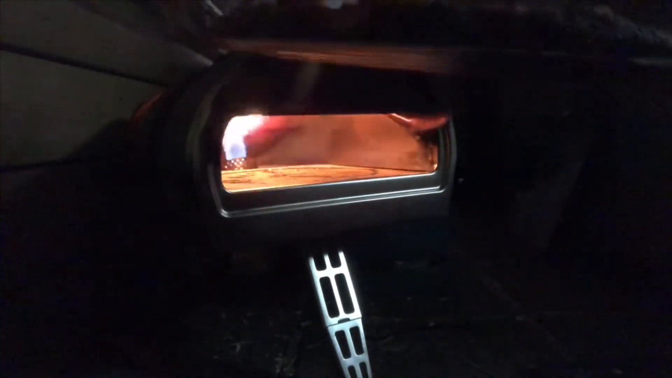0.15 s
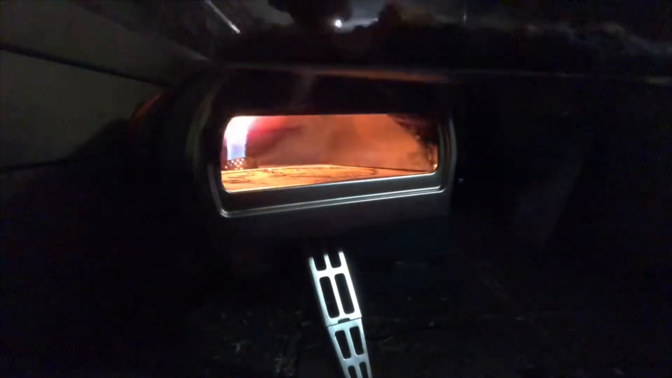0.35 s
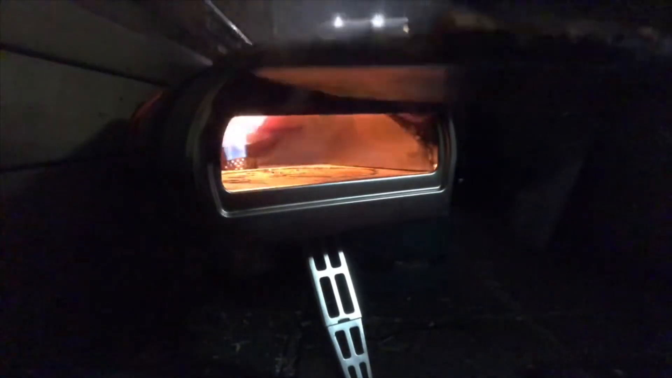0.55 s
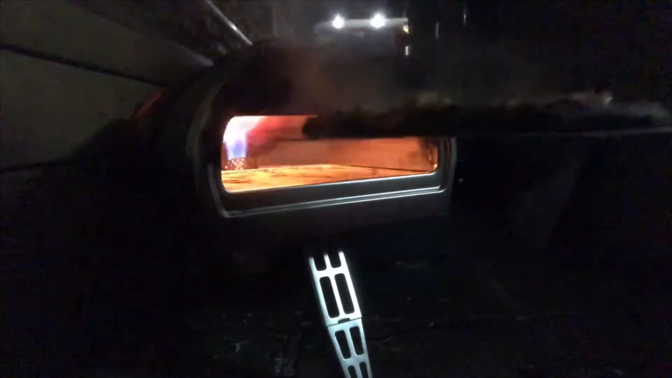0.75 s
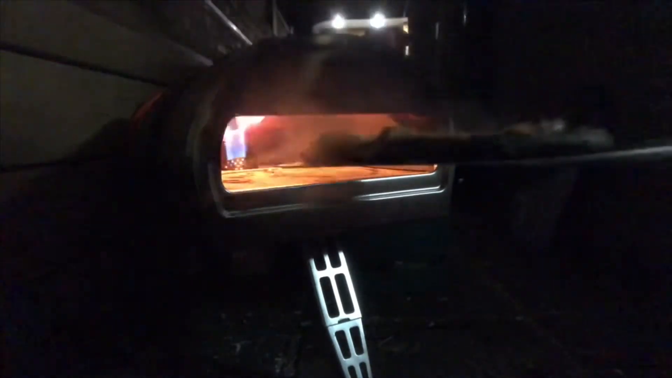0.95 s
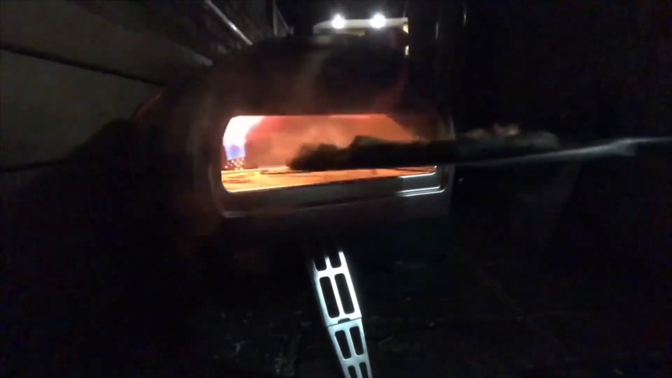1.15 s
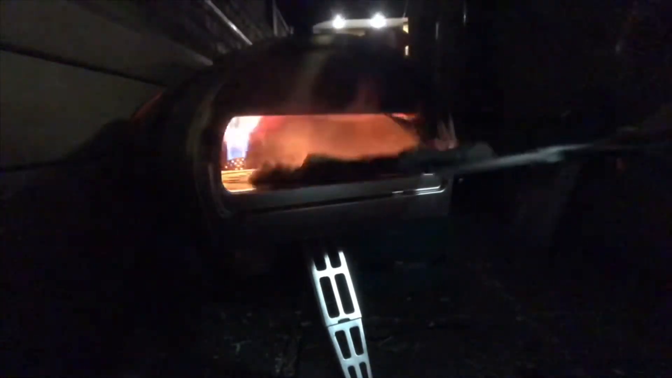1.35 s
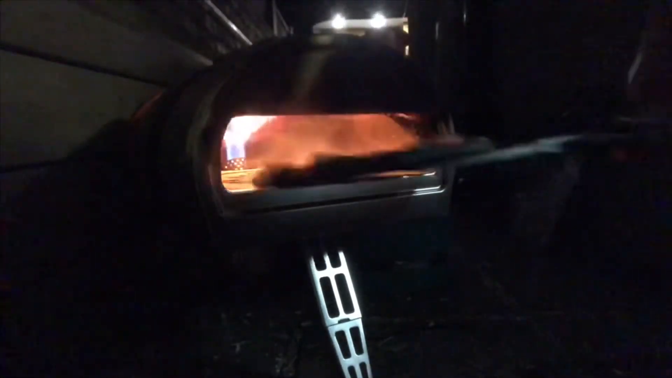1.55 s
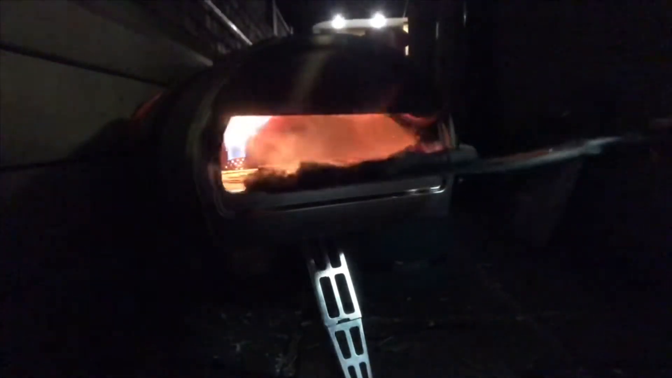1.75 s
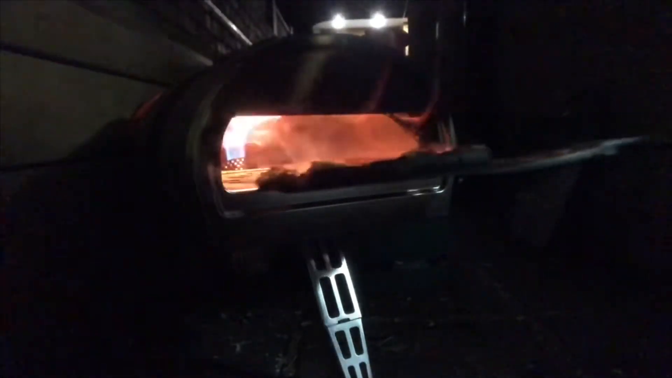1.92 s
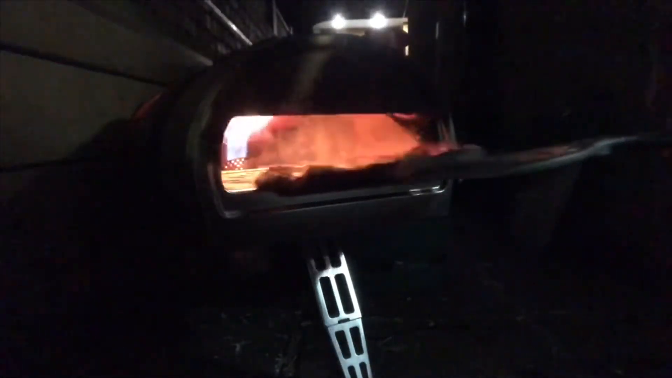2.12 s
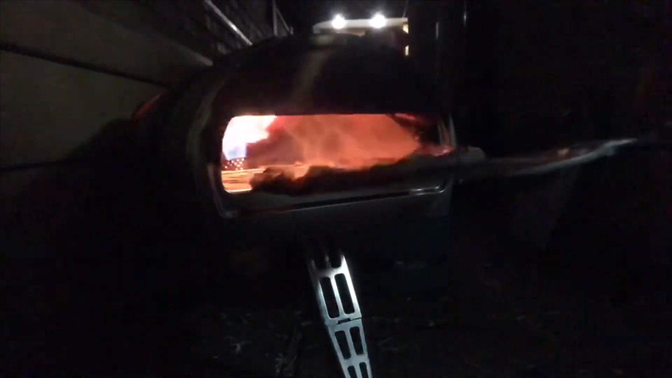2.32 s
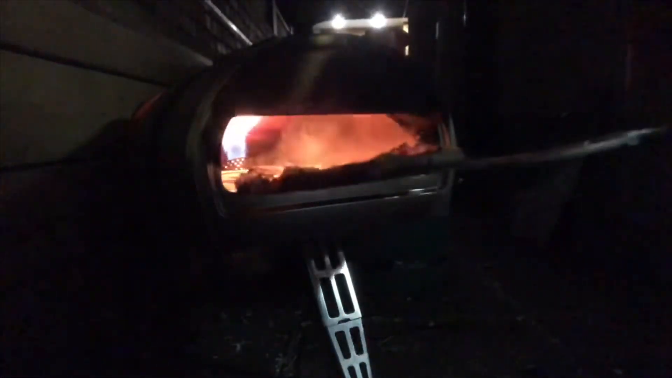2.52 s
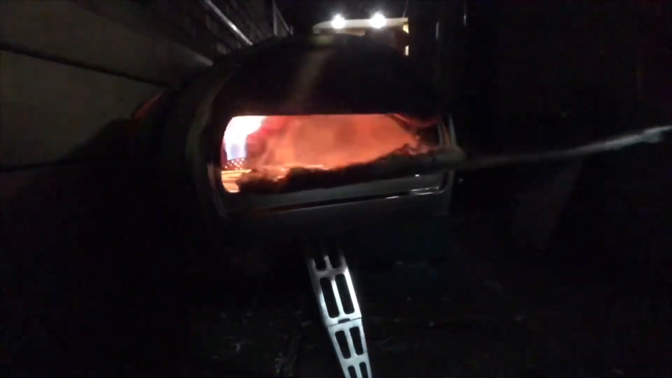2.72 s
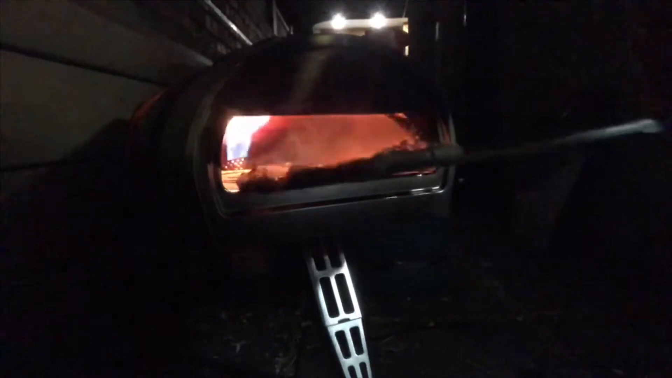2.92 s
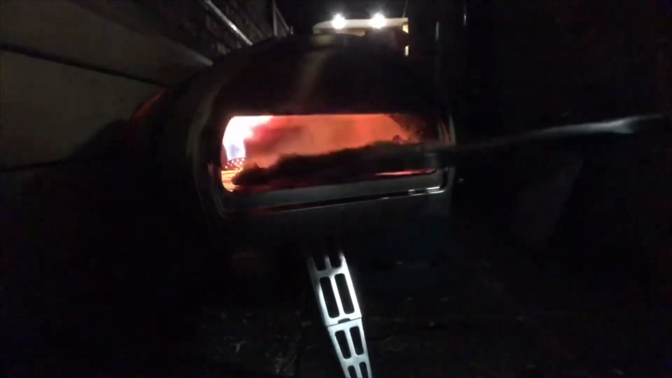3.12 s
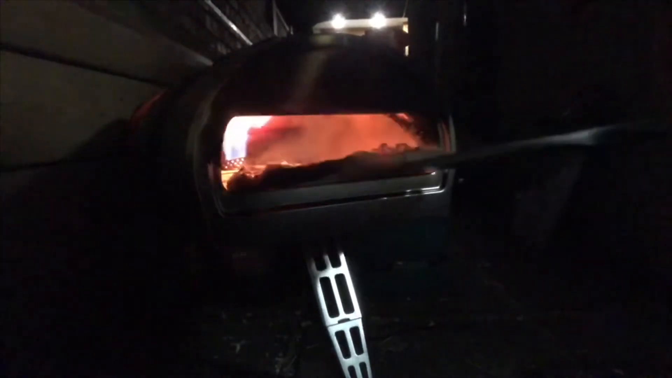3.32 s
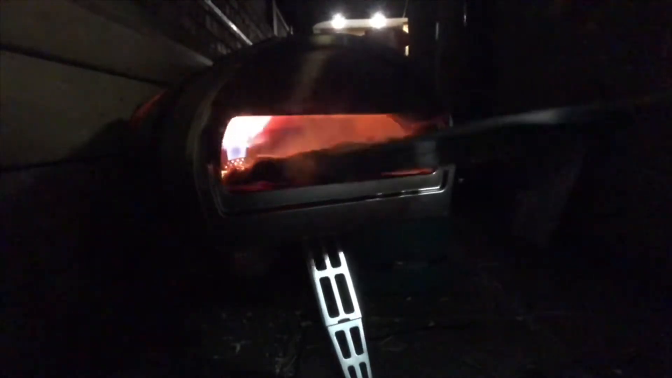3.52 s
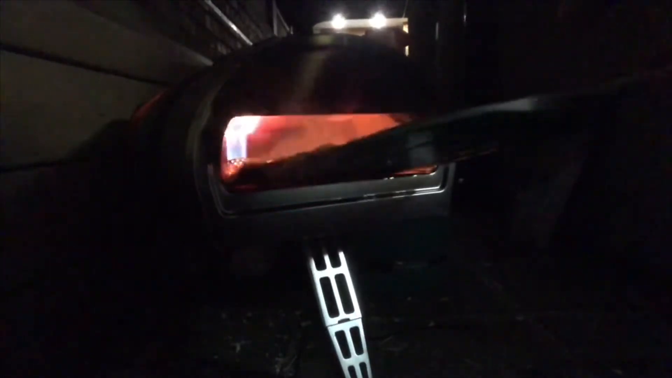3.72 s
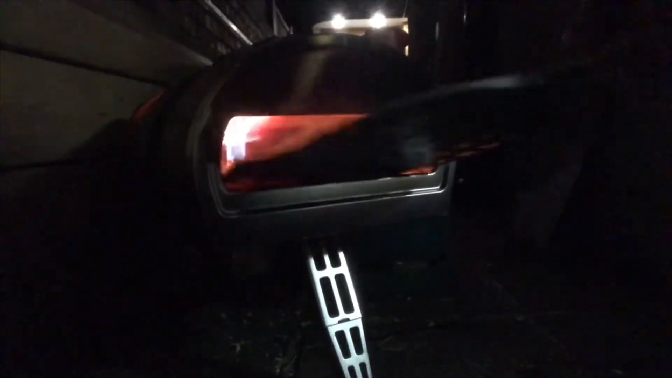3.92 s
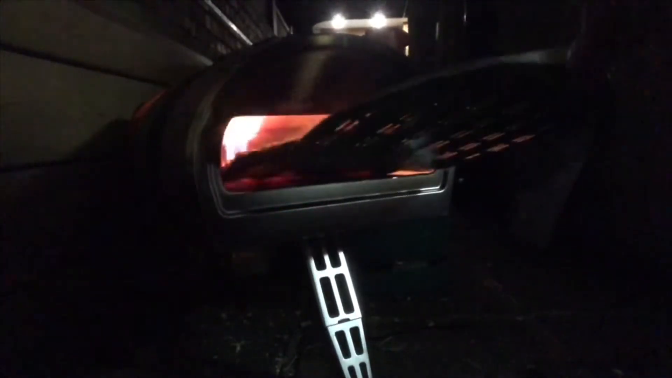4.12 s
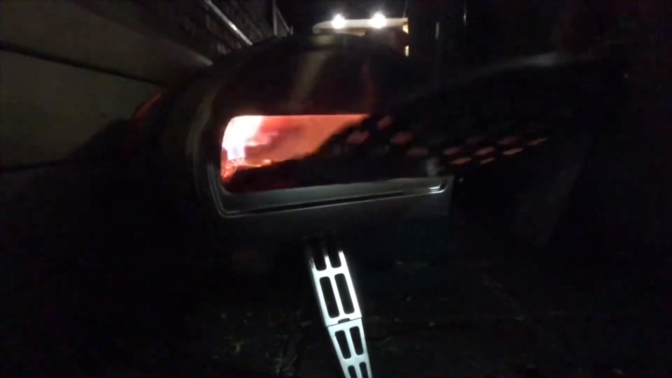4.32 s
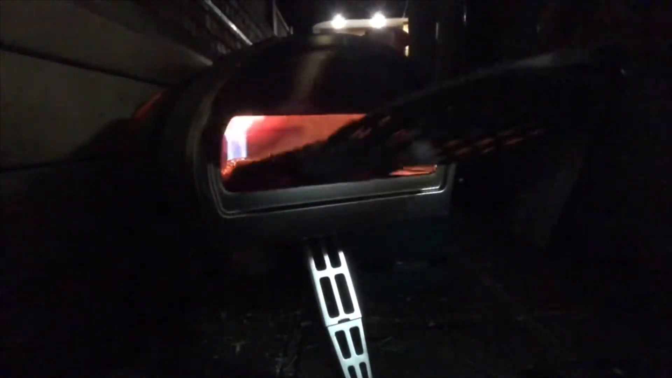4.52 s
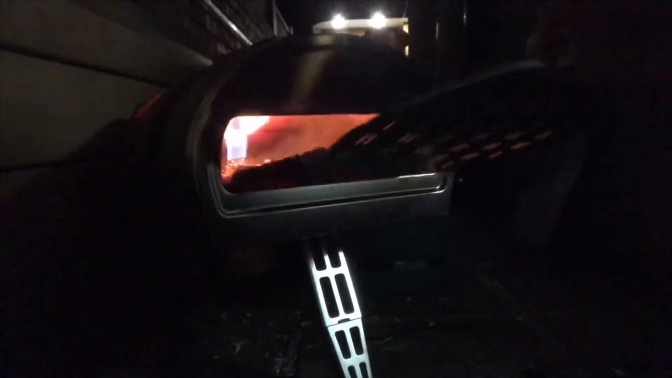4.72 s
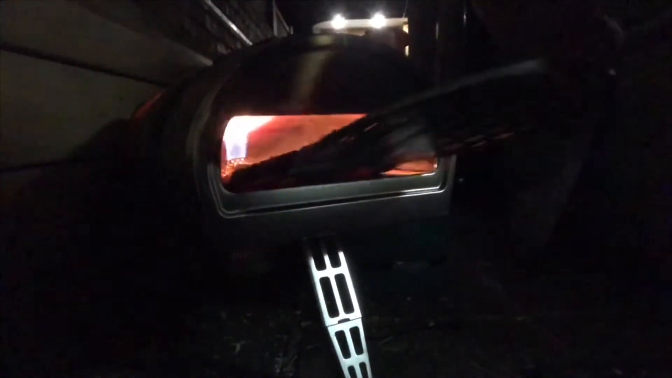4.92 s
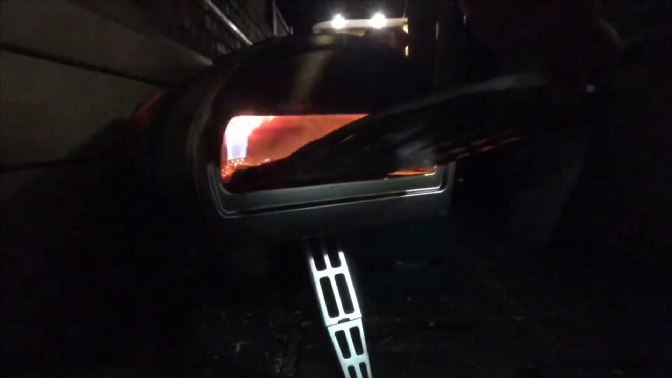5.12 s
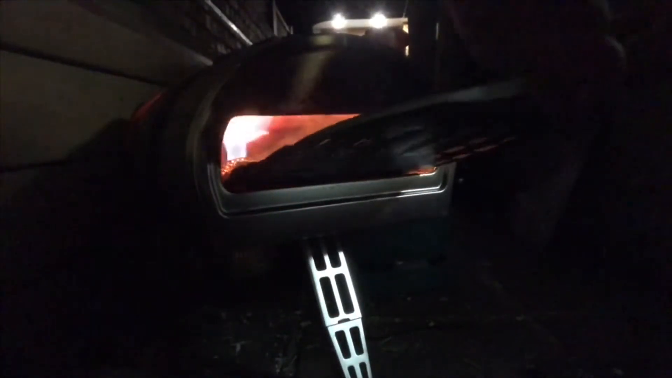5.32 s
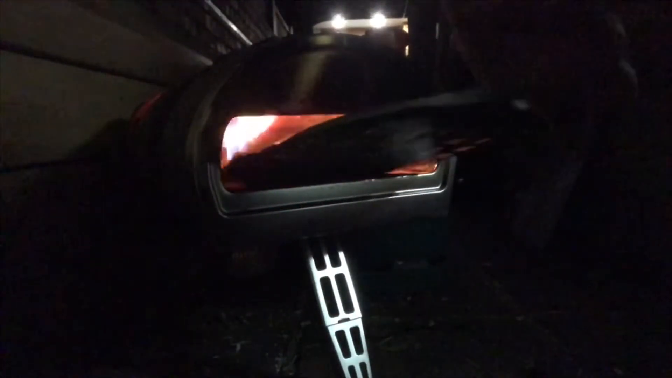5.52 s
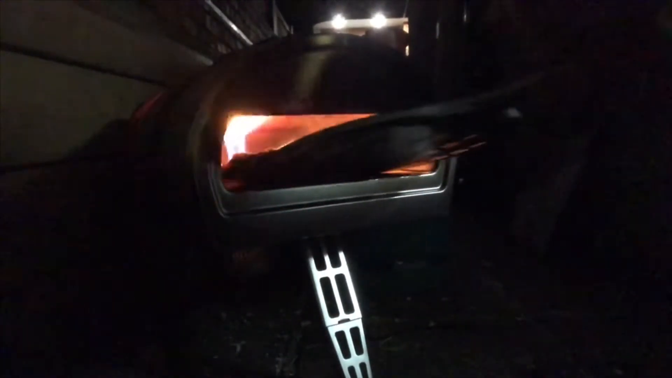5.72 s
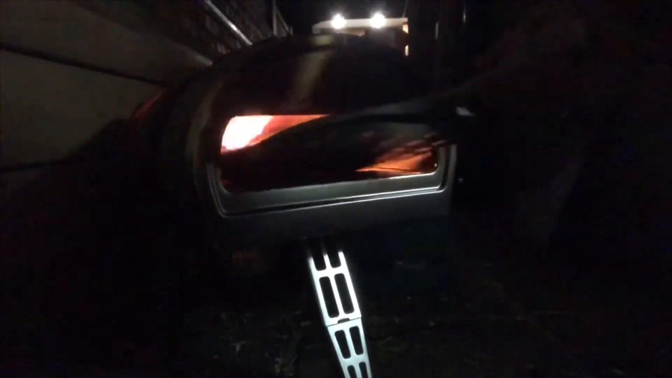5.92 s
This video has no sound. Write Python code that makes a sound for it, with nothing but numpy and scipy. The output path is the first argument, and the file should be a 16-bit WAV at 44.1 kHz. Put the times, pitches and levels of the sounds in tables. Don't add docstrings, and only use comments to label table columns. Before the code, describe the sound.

A thin metal peel knocks and rasps in short dry strokes over a stone oven floor, above a faint steady burner roar and hiss.

```python
import sys
import numpy as np
from scipy import signal
from scipy.fft import rfft, irfft, next_fast_len
from scipy.io import wavfile
from scipy.ndimage import uniform_filter1d

SR = 44100
rng = np.random.default_rng(int(sys.argv[2]) if len(sys.argv) > 2 else 0)


def invert_db(level):
    return 10 ** (np.asarray(level, dtype=float) / 20)


def store_wav(level_fs):
    pcm = np.round(np.clip(np.atleast_2d(level_fs), -1, 1) * 32767)
    wavfile.write(sys.argv[1], SR, pcm.T.astype(np.int16))


N = 267246

# pitch_hz, level_db, t60_s
HUM_MODES = [(200, -11, 0.015), (228, -7.5, 0.063), (323.3, -11.5, 0.2), (362, -7, 0.09)]
# pitch_hz, level_db, t60_s
BLADE_MODES = [(421, -12.5, 0.087), (472, -9.5, 0.071), (598, -3.5, 0.059), (730, 0, 0.037),
               (790, -9, 0.14), (870, -1, 0.05), (986, 4.5, 0.037), (1098, 4.5, 0.023), (1181, 6, 0.028),
               (1256, 4.5, 0.067), (1356, 1.5, 0.05), (1545, -9, 0.15), (1772, -6.5, 0.12),
               (1880, 3.5, 0.025), (1947, -3.5, 0.041), (2290, -0.5, 0.0093), (2480, 4, 0.031),
               (2656, -7, 0.11), (3004, 0.5, 0.031), (3260, -15, 0.037), (3870, 2, 0.07)]
# start_s, hold_s, rasp_db, blade_above_rasp_db, sizzle_above_rasp_db
LANDINGS = [(1.364, 0.051, -37, -4.5, -4.5), (1.463, 0.051, -39.5, -8, 1.5), (1.859, 0.011, -48.5, 8, -6),
            (2.1835, 0.036, -41, 5, -4), (2.558, 0.075, -41, 1.5, -7), (2.786, 0.072, -42, 1.5, -15.5),
            (3.13, 0.0047, -36.5, -2.5, -28), (3.333, 0.0068, -58.5, 14.5, 11),
            (3.414, 0.0069, -45.5, -4, -0.5), (3.568, 0.026, -37, -4.5, -22), (3.73, 0.033, -36, -7.5, -3),
            (3.844, 0.042, -32.5, 0, -5), (4.193, 0.0087, -56.5, 9, -23), (4.48, 0.0087, -39.5, -0.5, -1),
            (4.642, 0.0055, -46, 8.5, -30), (5.115, 0.0093, -60, 1, -12), (5.255, 0.061, -40, -8.5, -6),
            (5.464, 0.0054, -54, 17, -24), (5.616, 0.021, -29.5, 4.5, -4), (3.803, 0.044, -45, 2.5, -10),
            (1.763, 0.03, -43.5, -14, 0.5), (2.914, 0.033, -54, 8.5, -5), (3.705, 0.041, -47.5, 6, -10),
            (1.913, 0.023, -50, -7, 0), (3.9, .015, -43, 0, -10), (3.94, .012, -37, -8, -5),
            (3.28, 0.012, -52.5, -3, -7), (5.988, .02, -37, -15, 1)]


def scrape():
    # pitch_hz, density_db (per Hz)
    rasp_spectrum = [(880, -44), (1500, 0), (1590, -5.5), (2080, -4), (2800, 0.5), (2970, -0.5),
                     (4120, 2.5), (6960, -2.5), (11700, -11.5), (16000, -21.5)]
    rasp_db, blade_db, sizzle_db = strokes()
    touched = np.arange(N) >= LANDINGS[0][0] * SR
    rasp = touched * invert_db(rasp_db)
    force = grit(per_s=9000, spread_db=2.5, clump_db=1.5)
    low = rubbed(HUM_MODES, force * rasp * invert_db(blade_db - 16), wander_db=6.5)
    blade = rubbed(BLADE_MODES, force * rasp * invert_db(blade_db - 5.5), wander_db=3.5)

    broad = coloured(force, rasp_spectrum)
    above_8k = signal.butter(2, 8000, "high", fs=SR, output="sos")
    sizzle = signal.sosfiltfilt(above_8k, broad)
    drive = rasp * (rms_one(broad - sizzle) + invert_db(sizzle_db + 1.0) * rms_one(sizzle))

    points = 14
    pressure = np.array([wander(4.8, 7.8) for point in range(points)])
    pressure /= np.sqrt(np.sum(pressure ** 2, axis=0))
    responses = plate_responses(count=points, length=4096)
    plate = signal.fftconvolve(drive * pressure, responses, axes=1)[:, :N].sum(axis=0)
    return low + blade + invert_db(-2.0) * plate + invert_db(-7.5) * drive


def strokes():
    # full_speed_s, hold_s, rasp_db, blade_above_rasp_db, sizzle_above_rasp_db
    sweeps = [(1.601, 0.013, -34.5, -5.5, 0), (1.698, .01, -40, -8, 3.5), (5.85, .015, -35, -17, -1),
              (3.527, .006, -40, -3, -3), (1.722, 0.0098, -29, -6, 1.5), (1.923, 0.042, -39.5, -10.5, 1),
              (1.993, 0.043, -47, -6, -2.5), (1.634, 0.014, -42.5, -10, 0), (2.307, 0.041, -42, 3, -5.5),
              (2.385, 0.017, -39, 1.5, -6), (2.485, 0.032, -36, -7, -2.5), (2.697, 0.031, -37.5, -11, -0.5),
              (2.994, 0.06, -35.5, -2, -8.5), (3.498, 0.015, -45.5, -7, -8), (3.612, 0.055, -36, 4, -8),
              (3.962, 0.02, -30, -3.5, -5), (3.98, 0.02, -26.5, -9, -2.5), (4.015, 0.054, -29, 0.5, -15),
              (4.243, 0.015, -50.5, 6.5, -23), (4.3, 0.012, -42, -23, -5.5),
              (4.534, 0.0062, -36, -8.5, -13), (4.721, 0.014, -38.5, -0.5, -9),
              (4.762, 0.014, -37, -2.5, -9), (4.993, 0.073, -50.5, -23, -7), (5.169, 0.072, -51, -3, -8),
              (5.545, 0.089, -31, -13, 1), (5.754, 0.039, -30.5, -14, -1.5), (6.022, 0.043, -28, -9.5, 4.5),
              (5.34, 0.071, -39.5, -9.5, -2.5), (5.87, 0.065, -28, -2, 1)]
    # rasp_db_per_s, blade_db_per_s, sizzle_db_per_s
    let_go = (439, 335, 540)
    # rasp_db, blade_db, sizzle_db
    resting = (-56.5, -56.5, -64)
    land_db_per_s, sweep_db_per_s, sag_db_per_s = 6000, 458, 21
    s, hold, db, blade_db, sizzle_db = np.transpose(LANDINGS + sweeps)
    rise = np.repeat([land_db_per_s, sweep_db_per_s], [len(LANDINGS), len(sweeps)])
    rasp, blade, sizzle = (gestures(s, hold, db + above, rise, sag_db_per_s, fall, rest)
                           for above, fall, rest in zip([0, blade_db, sizzle_db], let_go, resting))
    return rasp, blade - rasp, sizzle - rasp


def grit(per_s, spread_db, clump_db):
    sizes = invert_db(spread_db * np.minimum(rng.exponential(1, N), 4)) * rng.choice([-1, 1], N)
    caught = rng.random(N) < per_s / SR
    return rms_one(sizes * caught * wander(clump_db, 32.3))


def rubbed(modes, force, wander_db):
    share = [invert_db(db) * np.sqrt(t60) for hz, db, t60 in modes]
    norm = np.sqrt(np.sum(np.square(share)) * SR / (12 * np.log(10)))
    return sum(ring(force * invert_db(db) * wander(wander_db, 22.2), hz, t60) for hz, db, t60 in modes) / norm


def plate_responses(count, length):
    t, out = np.arange(length) / SR, 0
    for low_hz, high_hz, t60 in [(694, 3870, 0.048), (2900, 9140, 0.017), (7000, 22000, 0.038)]:
        band_filter = signal.butter(2, [low_hz, high_hz], "band", fs=SR, output="sos")
        band = signal.sosfilt(band_filter, rng.standard_normal((count, length)))
        out = out + band * invert_db(-60 * t / t60) / np.sqrt(t60 * SR / (6 * np.log(10)))
    for octaves in .27 * (np.arange(10)[:, None, None] + rng.random((10, count, 1))):
        out = out + invert_db(-45.5 - 60 * t / 0.16) * np.sin(2 * np.pi * 1500 * 2 ** octaves * t)
    tones = rfft(out)
    power = uniform_filter1d(np.mean(np.abs(tones) ** 2, axis=0), size=28)
    return irfft(tones / np.sqrt(power + .01))


def knocks():
    # start_s, peak_db, hum_above_peak_db, crack_above_peak_db, thud_above_peak_db
    flat_knocks = [(1.567, -38, -4, -4, -16), (1.85, -13, -17, -3, -12), (2.184, -18.5, -16, -12, -20),
                   (2.212, -23, -12, -5, -13), (2.376, -32.5, -8, -18, -13), (2.391, -21.5, -14, -4, -13.5),
                   (2.576, -15, -16.5, -2, -32), (2.792, -19.5, -39, -11, -23),
                   (3.336, -24, -29, -10.5, -37), (3.412, -35, -34, 0, -30), (3.61, -34, -21, -11, -8),
                   (3.845, -13.5, -25, -8, -8), (4.475, -20.5, -35, 2, -19), (4.641, -25, -27, -9.5, -22),
                   (4.789, -21.5, -30, -18, -9.5), (5.464, -17, -18.5, -12.5, -12.5),
                   (5.863, -20.5, -13, -16, -5)]
    # start_s, peak_db, pitch_hz (strongest), crack_above_peak_db,
    # thud_above_peak_db
    edge_knocks = [(1.363, -12, 3420, -11, -20), (1.439, -21, 1540, -10, -16.5),
                   (1.465, -25, 2570, -8, -24), (1.695, -20, 1610, -8, -35),
                   (2.454, -19.5, 1610, -7.5, -19), (3.132, -18, 3280, -3, -19),
                   (3.5676, -24.5, 2500, -1.5, -29), (3.802, -20, 1580, -23, -22),
                   (4.012, -6.5, 2600, -3, -27), (4.058, -20.5, 1570, 8, -13),
                   (4.197, -23.5, 2060, -17, -18), (4.535, -30, 1550, -6, -26), (5.116, -31, 1570, -1, -26),
                   (5.257, -28, 1590, 3, -31), (5.617, -2, 870, -3.5, -12.5), (5.682, -14, 730, -7, -23),
                   (6.01, -31, 2740, 15.5, -23)]
    flat_hz, edge_hum_db = 1240, -32
    flats = [(s, db, flat_hz, *rest) for s, db, *rest in flat_knocks]
    edges = [(s, db, hz, edge_hum_db, *rest) for s, db, hz, *rest in edge_knocks]
    s, peak_db, pitch_hz, hum_db, crack_db, thud_db = np.transpose(flats + edges)

    modes = HUM_MODES + BLADE_MODES
    luck = rng.normal(0, 1, (len(s), len(modes)))
    out = np.zeros(N)
    for k, (hz, db, t60) in enumerate(modes):
        if k < len(HUM_MODES):
            share_db = hum_db + 7.5
        else:
            octaves = np.abs(np.log2(hz / pitch_hz))
            share_db = -10 - np.where(hz > pitch_hz, 15, 7) * octaves
        blow_db = peak_db + share_db + .5 * db + 2.0 * luck[:, k]
        swell_hz = min(22 * (hz / 237) ** 1.2, 3000)
        out += resonance(ring(clicks(s, blow_db), hz, 0.46 * t60), hz, swell_hz)

    clack_db = peak_db - 12.0 - 3 * np.abs(np.log2(pitch_hz / 1300))
    clack = resonance(ring(clicks(s, clack_db), 1110, 0.043), 1330, 630)
    thud = dying_noise(s, peak_db + thud_db - 3, 380, 834, [(-5.5, 0.045), (-9.5, 0.25)], rise_s=0.0036)
    crack = dying_noise(s, peak_db + crack_db - 13, 1650, 8000, [(0.5, 0.03), (-4.5, 0.09)],
                        rise_s=0.000089)
    return out + clack + thud + crack


def ringing_on():
    # start_s, pitch_hz, level_db, t60_s
    left_ringing = [(1.851, 326, -22, 0.13), (1.851, 360, -23, 0.1), (1.858, 650, -40, .1),
                    (1.849, 1190, -22, .04), (2.186, 320, -30, 0.094), (2.577, 332, -40, 0.083),
                    (3.86, 320, -30.5, .2), (3.895, 330, -27, 0.1), (4.197, 340, -36.5, 0.079),
                    (3.412, 1200, -38, .08), (3.846, 450, -29, 0.069), (3.875, 350, -32, 0.11),
                    (4.011, 750, -22, 0.034), (4.4, 1000, -25, 0.018), (4.478, 202, -28, 0.11),
                    (4.8, 340, -40.5, 0.21), (4.789, 1630, -20.5, .012), (4.641, 2430, -27, .01),
                    (3.628, 700, -30.5, .05), (3.615, 450, -33, .05), (3.648, 423, -33, .06),
                    (3.72, 600, -36, .08), (5.69, 760, -31, 0.18), (5.864, 480, -27, 0.064),
                    (4.545, 1545, -36, .15), (4.475, 1545, -36, 0.21), (5.617, 326, -19.5, 0.17),
                    (5.617, 460, -16, 0.108), (5.617, 1900, -18.5, .04), (5.617, 732, -8, 0.044),
                    (5.63, 750, -28.5, 0.28), (5.617, 1030, -11, .05), (5.618, 1190, -5, 0.026),
                    (5.617, 200, -15.5, 0.074), (5.681, 1254, -30, .08), (5.465, 480, -45, .06)]
    return sum(resonance(ring(clicks([s], db), hz, t60), hz, 25 * (hz / 237) ** 1.43)
               for s, hz, db, t60 in left_ringing)


def singing():
    # full_s, hold_s, level_db
    flexes = [(1.461, 0.022, -36.5), (3.818, 0.027, -41.5), (4.07, 0.026, -37.5), (1.574, 0.005, -35.5),
              (1.733, 0.019, -36.5), (1.865, .01, -36.5), (1.951, 0.042, -40), (2.193, 0.064, -42.5),
              (2.302, 0.025, -35.5), (2.461, 0.21, -41.5), (2.742, 0.0047, -35), (2.804, 0.042, -37),
              (2.99, 0.017, -39), (3.15, 0.015, -39), (3.292, 0.02, -41), (3.494, 0.017, -44),
              (3.7, 0.035, -49), (3.865, 0.035, -43), (3.96, 0.028, -40), (4.032, 0.014, -26.5),
              (4.2, 0.027, -48), (4.488, 0.0032, -32), (4.65, 0.0066, -45), (4.796, 0.0045, -38),
              (5.127, 0.014, -46.5), (5.37, .02, -46.5), (5.46, 0.0091, -53), (5.64, 0.012, -21),
              (5.688, 0.062, -37.5), (5.894, 0.065, -28.5), (5.974, 0.052, -43), (5.162, 0.07, -51)]
    # start_s, length_s, pitch_hz, level_db
    squeals = [(1.7, 0.033, 1608, -35.5), (1.94, 0.033, 7000, -40.5), (2.192, 0.027, 1226, -33),
               (2.375, .014, 1250, -38), (2.386, 0.016, 1210, -34), (2.406, 0.011, 1230, -31),
               (3.042, 0.042, 3390, -50), (3.6, 0.025, 1200, -33.5), (3.653, 0.079, 200, -38.5),
               (4.057, 0.053, 1545, -30.5), (4.297, 0.068, 3080, -46), (4.3, 0.037, 5680, -45),
               (4.53, 0.035, 1545, -36), (4.534, 0.085, 2056, -46.5), (4.195, 0.25, 666, -57.5),
               (4.527, 0.035, 3045, -39.5), (4.528, 0.03, 3460, -40), (4.532, 0.02, 4550, -36.5),
               (4.724, 0.014, 1880, -39), (4.721, 0.064, 2400, -43), (4.529, 0.029, 6430, -40),
               (4.533, 0.017, 8460, -37.5), (4.698, 0.037, 9300, -46), (4.761, 0.023, 9440, -40),
               (4.71, 0.013, 1230, -35), (4.729, 0.025, 1248, -36), (4.752, 0.0085, 1240, -32.5),
               (4.771, 0.014, 1290, -30), (4.74, .012, 3400, -41), (4.762, 0.041, 3400, -42),
               (2.21, 0.013, 1950, -40), (2.389, .03, 2540, -37.5), (3.645, .015, 1238, -38),
               (3.987, 0.032, 2630, -29), (4.76, .03, 7000, -46), (3.715, 0.021, 1250, -43),
               (3.056, 0.032, 6800, -40), (3.65, 0.039, 4890, -41), (5.534, 0.025, 2950, -36),
               (5.86, 0.03, 1243, -30.5), (6.009, 0.018, 5670, -26), (6.039, 0.039, 3870, -23.5)]
    hum_hz, hum_width_hz = 237.6, 14.7
    flex_db_per_s, sag_db_per_s, unflex_db_per_s, resting_db = 734, 35, 433, -61.5
    noise, t = rng.standard_normal(N), np.arange(N) / SR
    narrow = resonance(resonance(noise, hum_hz, hum_width_hz), hum_hz, hum_width_hz)
    flex_db = gestures(*np.transpose(flexes), flex_db_per_s, sag_db_per_s, unflex_db_per_s, resting_db)
    touched = t > LANDINGS[0][0]
    out = touched * invert_db(flex_db) * evened(narrow)
    for s, length, hz, db in squeals:
        swell = np.interp(t, s + length * np.array([0, .25, .6, 1.5]), [0.00038, 1.0, 0.7, 0.0069])
        tone = evened(resonance(resonance(noise, hz, 33), hz, 33))
        out += invert_db(db) * swell * wander(2.36, 41) * tone
    return out


def crumbs():
    # start_s, peak_db, pitch_hz
    falls = [(0.1524, -49, 7490), (0.1732, -42, 5160), (0.1834, -44, 10600), (0.19, -41, 7900),
             (0.205, -40, 10300), (0.2084, -41, 6910), (0.2258, -33, 4600), (0.2404, -46, 3330),
             (0.3147, -40.5, 5650), (0.3214, -47, 6080), (0.3274, -52, 3260), (0.374, -46, 6000),
             (0.4244, -53, 5970), (0.9894, -55, 6000), (1.1194, -56, 3210), (4.977, -35.5, 5200),
             (5.2394, -35, 4328), (5.4954, -42, 8570)]
    out = np.zeros(N)
    t = np.arange(400) / SR
    for (s, db, hz), noise in zip(falls, rng.standard_normal((len(falls), len(t)))):
        tick = rms_one(resonance(noise, hz, 0.45 * hz))
        tick += invert_db(-8) * rms_one(resonance(noise, 1900, 1800))
        tick += invert_db(-6.5) * rms_one(resonance(noise, 11500, 6000))
        decay = invert_db(db - 11 - 60 * t / 0.024) * (1 + 1.2 * np.exp(-t / 0.00036))
        start = round(s * SR)
        out[start:start + len(t)] += tick * decay
    falling = np.interp(np.arange(N) / SR, [.15, .18, .23, .25, .31, .33, .39, .43],
                        [0.12, 0.85, 0.53, 0.053, 0.16, 0.35, 0.14, 0.078])
    grains = grit(per_s=2000, spread_db=1, clump_db=1.0)
    patter = invert_db(-58.5) * rms_one(resonance(grains, 12000, 8000))
    patter += invert_db(-55.5) * rms_one(resonance(grains, 2300, 3500))
    return out + falling * patter


def burner():
    # pitch_hz, density_db (per Hz)
    roar_spectrum = [(12, -37), (20, -3), (204, -2.5), (328, -14.5), (357, -16.5), (410, -17), (459, -15.5),
                     (1400, -19.5), (1960, -30), (2390, -14.5), (3950, -58), (6010, -31), (11100, -46.5),
                     (14700, -37), (15500, -50)]
    # pitch_hz, width_hz, rms_db
    jets = [(1400, 120, -73), (2163, 34, -70.5), (2325, 135, -65), (3310, 260, -66.5), (4600, 120, -73.5),
            (5150, 250, -78), (6000, 66, -73), (6800, 170, -76), (7370, 220, -72), (7720, 120, -75.5),
            (14700, 200, -80)]
    roar_db = -52.5
    out = coloured(rng.standard_normal(N), roar_spectrum) * invert_db(roar_db) * wander(0.35, 4.6)
    gas = rng.standard_normal(N)
    for hz, width, db in jets:
        hiss = resonance(resonance(gas, hz, 1.8 * width), hz, 1.8 * width)
        out += invert_db(db) * wander(1.9, 4.0) * rms_one(hiss)
    return out


def gestures(s, hold, db, rise_db_per_s, sag_db_per_s, fall_db_per_s, rest_db):
    linger_s = 0.22
    step = 32
    t = np.arange(0, N + step, step) / SR - np.c_[s]
    after = np.maximum(t - np.c_[hold], 0)
    rise = np.c_[rise_db_per_s] * np.minimum(t, 0)
    sag = sag_db_per_s * np.clip(t, 0, np.c_[hold])
    fall = fall_db_per_s * after / (1 + after / linger_s)
    level = np.c_[db] + rise - sag - fall
    total = np.sum(invert_db(2 * np.maximum(level, -150)), axis=0) + invert_db(2 * rest_db)
    return np.interp(np.arange(N) / step, np.arange(len(total)), 10 * np.log10(total))


def dying_noise(times, db, low_hz, high_hz, parts, rise_s):
    hit = clicks(times, db) + 1e-18
    shape = sum(invert_db(part_db) * signal.lfilter([1], [1, -invert_db(-60 / (t60 * SR))], hit)
                for part_db, t60 in parts)
    r = np.exp(-1 / (rise_s * SR))
    band_filter = signal.butter(2, [low_hz, high_hz], "band", fs=SR, output="sos")
    noise = signal.sosfilt(band_filter, rng.standard_normal(N))
    return signal.lfilter([1 - r], [1, -r], shape) * rms_one(noise)


def wander(db, rate):
    step = 40
    r = np.exp(-2 * step * np.pi * rate / SR)
    noise = rng.standard_normal(N // step + 2002)
    slow = signal.lfilter([1], [1, -2 * r, r * r], noise)[2000:]
    return np.interp(np.arange(N) / step, np.arange(len(slow)), invert_db(db * rms_one(slow)))


def evened(x):
    return x / np.sqrt(uniform_filter1d(x ** 2, size=600) + 0.033 * np.mean(x ** 2))


def rms_one(x):
    return x / np.sqrt(np.mean(x ** 2) + 1e-20)


def at_hz(points, hz):
    points = np.array(points)
    return np.interp(np.log(hz), np.log(points[:, 0]), points[:, 1])


def coloured(x, spectrum):
    size = next_fast_len(N)
    gain = invert_db(at_hz(spectrum, np.fft.rfftfreq(size, 1 / SR) + 1))
    return irfft(rfft(x, size) * rms_one(gain), size)[:N]


def resonance(x, hz, width_hz):
    r, w = np.exp(-np.pi * width_hz / SR), 2 * np.pi * hz / SR
    b = np.array([1, 0, -1]) * (1 - r * r) / 2
    return signal.lfilter(b, [1, -2 * r * np.cos(w), r * r], x + 1e-18)


def ring(x, hz, t60):
    r, w = invert_db(-60 / (t60 * SR)), 2 * np.pi * hz / SR
    return signal.lfilter([0, np.sin(w)], [1, -2 * r * np.cos(w), r * r], x + 1e-18)


def clicks(times, db):
    out = np.zeros(N)
    out[np.round(np.asarray(times) * SR).astype(int)] = invert_db(db)
    return out


def scene():
    peel = scrape() + singing() + knocks() + ringing_on()
    peel = signal.sosfilt(signal.butter(4, 170, "high", fs=SR, output="sos"), peel)
    return np.tile(peel + crumbs() + burner(), (2, 1))


def low_pass(x):
    return signal.sosfilt(signal.butter(12, 17090, fs=SR, output="sos"), x)


def record(dry):
    x = signal.sosfilt(signal.butter(6, 42, "high", fs=SR, output="sos"), dry)
    x = signal.sosfilt(signal.ellip(10, .5, 55, 15800, fs=SR, output="sos"), x)
    return low_pass(x)


dry = scene()
out = record(dry)
store_wav(out)
```